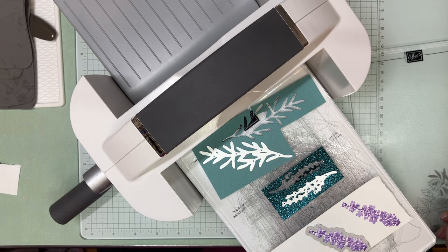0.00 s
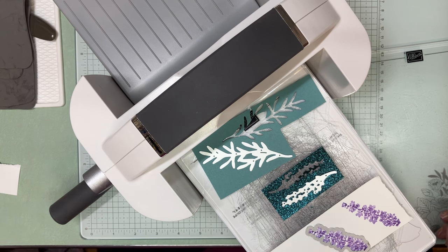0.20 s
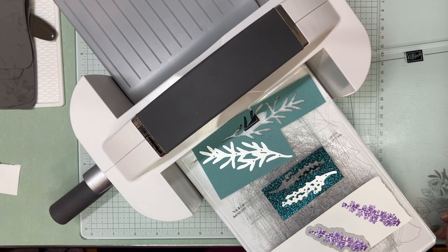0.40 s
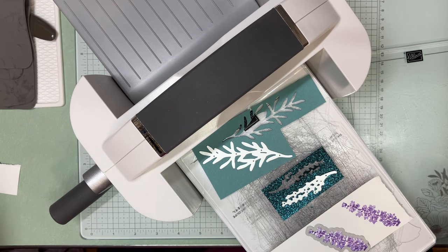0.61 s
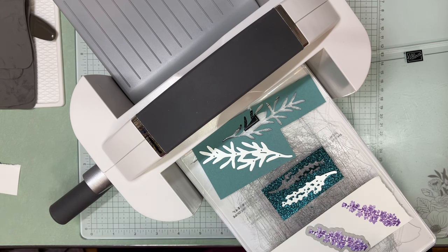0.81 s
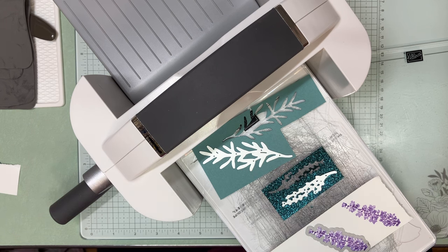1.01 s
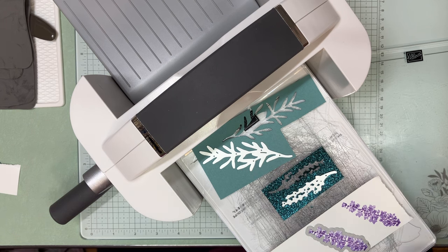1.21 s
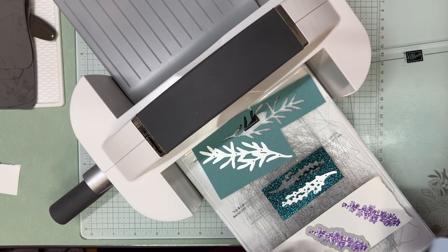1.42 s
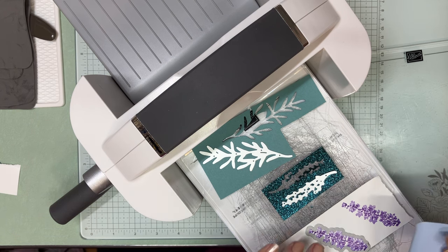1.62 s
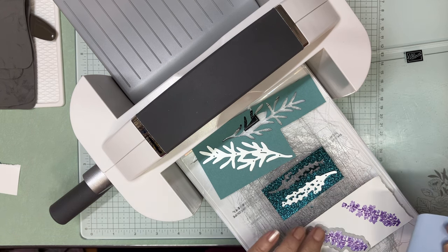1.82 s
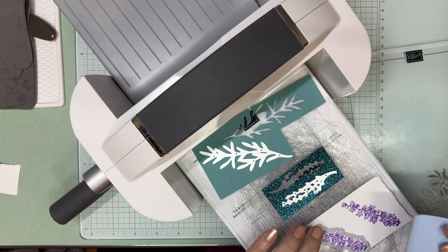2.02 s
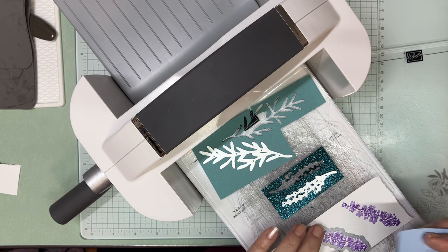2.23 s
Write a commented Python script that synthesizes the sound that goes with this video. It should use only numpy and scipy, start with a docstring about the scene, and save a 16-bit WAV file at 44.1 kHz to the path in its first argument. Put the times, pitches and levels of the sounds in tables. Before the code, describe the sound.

Sticky note peeled with a short rip, pad dropped on a craft table, then light paper flicks and slides

```python
"""Sticky note at a craft table

A note is peeled from its pad, the pad is put down on a craft table, and the note is pressed onto paper.
Peel and slides are trains of tiny random slips; flicks add a crack, a crackle and a brief ring.
The pad's knocks are noise bursts coloured by the ringing table top, with a low sine thud.
A pair of close microphones hears it in a small room with a low rumble and faint hiss."""
import sys
import numpy as np
from scipy import signal
from scipy.fft import rfft, irfft
from scipy.io import wavfile
from scipy.ndimage import map_coordinates

SR = 44100
rng = np.random.default_rng(int(sys.argv[2]) if len(sys.argv) > 2 else 0)


def store_pcm(level_fs):
    """Save levels as 16-bit WAV."""
    pcm = np.round(np.clip(level_fs, -1, 1) * 32767).astype(np.int16)
    wavfile.write(sys.argv[1], SR, np.atleast_2d(pcm).T)


N = 101430
HZ, T = np.fft.rfftfreq(N, 1 / SR), np.arange(N) / SR


def amp(db):
    """Decibels to gain."""
    return 10 ** (np.asarray(db) / 20)


def evened(x):
    """Scales to rms 1."""
    return x / np.sqrt(np.mean(x ** 2) + 1e-20)


def read(points, hz):
    """Reads a table on a log-frequency axis."""
    f, value = np.transpose(points)
    return np.interp(np.log(hz + 1), np.log(f + 1), value)


def level(points):
    """Gain along a level curve, silent outside it."""
    s, db = np.transpose(points)
    return amp(np.interp(T, s, db)) * (T >= s[0]) * (T <= s[-1])


def hump(hz, octaves):
    """Bell-shaped rise of the spectrum, height 1."""
    return np.exp(-.5 * (np.log2((HZ + 1) / hz) / octaves) ** 2)


def treble():
    """Shelf that rises from 0 toward 1 at the top."""
    treble_hz = 5470
    return HZ ** 2 / (HZ ** 2 + treble_hz ** 2)


def delayed(x, s):
    """The same sound, s seconds later."""
    return irfft(rfft(x) * np.exp(-2j * np.pi * HZ * s), N)


def colour(x, db):
    """Causal minimum-phase filter of unit power with the given gain per frequency."""
    gain = evened(amp(db))
    log_gain = np.log(np.r_[gain, gain[-2:0:-1]])
    response = np.exp(np.conj(signal.hilbert(log_gain)))[:len(HZ)]
    return irfft(rfft(x) * response, N)


def pair(a, b, same, pan_db=0):
    """Two microphones hear a shared part a and a differing part b; positive pan favours the left."""
    mid = rfft(a) * np.sqrt((1 + same) / 2)
    side = rfft(b) * np.sqrt((1 - same) / 2)
    return irfft(np.array([mid + side, mid - side]), N) * amp([[pan_db / 2], [-pan_db / 2]])


# how alike the two microphones hear the paper: pitch_hz, likeness (0-1)
MIC_LIKENESS = [(100, 1), (500, 0.84), (1200, 1), (3000, 0), (7000, 0), (15000, 1)]


def radiate(force, db, pan_db=0):
    """Tiny slips of random sign sound through a sheet; 3-7 kHz differs most between the microphones."""
    a, b = colour(force * rng.choice([-1., 1.], (2, N)), db)
    return pair(a, b, np.clip(read(MIC_LIKENESS, HZ), 0, 1), pan_db)


def grains(per_s, spread_db):
    """Random train of slips of uneven size."""
    size = np.minimum(rng.exponential(1, N), 4)
    slips = rng.random(N) < per_s / SR
    return evened(amp(spread_db * size) * slips)


def blow(start, rise_s, decay_s):
    """Quick rounded rise and exponential fall."""
    t = np.maximum(T - start, 0)
    return (1 - np.exp(-(t / rise_s) ** 2)) * np.exp(-t / decay_s)


# spectrum of the room's rumble and hiss: pitch_hz, level_db
FLOOR_COLOUR = [(20, -28), (33, -20), (52, 4), (70, 5.5), (100, -6), (150, -16.5), (250, -22.5), (500, -28),
                (1200, -36.5), (2200, -35), (4000, -40.5), (9000, -47.5), (16000, -43.5)]


def floor():
    """Low room rumble under a faint hiss: coloured noise, shared by both microphones in the lows."""
    floor_db, mono_hz = -60, 540
    a, b = colour(rng.standard_normal((2, N)), read(FLOOR_COLOUR, HZ))
    return amp(floor_db) * pair(a, b, 1 / (1 + (HZ / mono_hz) ** 2), pan_db=1.4)


# decay of the room's tail: pitch_hz, t60_s
ROOM_DECAY = [(100, .2), (500, .17), (1500, 0.14), (4000, 0.17), (8000, 0.16), (16000, 0.1)]
# strength of the diffuse sound: pitch_hz, level_db
ROOM_COLOUR = [(100, -19), (350, -3), (1000, -3), (4000, -3), (8000, -3.5), (16000, -9)]


def room(x):
    """Early reflections from the table and the things on it, then a short tail, both decaying noise."""
    tail_db, early_db, early_decay_s = -11, -3.5, 0.027
    apart_hz = 1200  # above this the microphones hear increasingly separate echoes
    t = T[:SR // 2]
    early, late = rng.standard_normal((2, 2, len(t))) * (t > .002)
    early = early * np.exp(-t / early_decay_s)
    # each band of the tail dies at its own pace
    hz, at, z = signal.stft(late, SR, nperseg=256)
    decay = amp(-60 * at / read(ROOM_DECAY, hz)[:, None])
    late = signal.istft(z * decay, SR)[1][:, :len(t)]
    echo = (amp(early_db) * evened(early) + amp(tail_db) * evened(late)) / np.sqrt(len(t))
    sent = irfft(rfft(x) * amp(read(ROOM_COLOUR, HZ)), N)
    a, b = signal.fftconvolve(sent, echo, axes=1)[:, :N]
    return pair(a, b, 1 / (1 + (HZ / apart_hz) ** 2), pan_db=-0.1)


# the pad lands and settles: start_s, level_db, decay_s, thud_db (against level_db), left_over_right_db
PAD_KNOCKS = [(0.509, -32, 0.043, -27, 2), (.533, -27, 0.018, -10.5, 6), (.552, -30.5, 0.014, -5, -7),
              (0.7322, -38.5, 0.0058, -16, 9)]
# spectrum of the knock: pitch_hz, level_db
KNOCK_COLOUR = [(30, -15), (60, 2.5), (90, -2.5), (125, -10), (170, -19.5), (210, -1.5), (280, -5),
                (420, 2), (560, -5.5), (750, 1), (1400, -3), (2200, -0.5), (3100, -0.5), (4500, -8),
                (8000, -20.5), (16000, -19.5)]
# resonances of the table top: pitch_hz, level_db, twice_t60_s (sets the width of the peak)
TABLE_MODES = [(297, 4, 0.2), (400, -32, 0.17), (683, 5.5, .18), (791, -1.5, .2), (1006, -2.5, 0.14),
               (1100, -10.5, 0.14), (1288, -0.5, 0.077), (1344, 9.5, 0.12), (1692, 6.5, .16),
               (1892, -6, 0.2), (1870, 0, 0.34), (2237, -4.5, 0.086), (2320, 4, .1), (3150, -7, 0.14)]


def knocks():
    """The pad's leaves slap down, ring the table top and give it a soft thud."""
    slap_db, slap_rise_s = -5.5, 0.00017
    thud_hz, thud_rise_s, thud_decay_s = 140.7, 0.016, 0.031
    ring = 0
    for hz, db, width_s in TABLE_MODES:
        ring = ring + amp(db) / (1 + 1j * (HZ - hz) * np.pi * width_s / np.log(1000))
    tone = read(KNOCK_COLOUR, HZ) + 20 * np.log10(abs(amp(slap_db) + ring))
    out = np.zeros((2, N))
    for s, db, decay, thud_db, pan in PAD_KNOCKS:
        out += radiate(amp(db) * blow(s, slap_rise_s, decay), tone, pan)
        thud = blow(s, thud_rise_s, thud_decay_s) * np.sin(2 * np.pi * thud_hz * (T - s))
        out += amp(db + thud_db) * thud
    return out


def patchy(x):
    """The colour drifts at random as the contact moves over the sheet."""
    patch_db, patch_s, patch_hz = 3.5, 0.048, 417  # rms depth, then size of a patch
    hz, at, z = signal.stft(x, SR, nperseg=512)
    where = np.meshgrid(hz / patch_hz, at / patch_s, indexing="ij")
    field = map_coordinates(rng.standard_normal((200, 300)), where, order=1, mode="wrap")
    return signal.istft(z * amp(patch_db * evened(field)), SR)[1][:, :N]


# paper sliding on paper, one curve per stroke: time_s, level_db
SLIDE_STROKES = [
    [(0, -49.5), (.025, -60.5), (.045, -66), (.07, -85)],
    [(.12, -57.5), (.17, -75), (.35, -66), (.395, -50.5), (.42, -55), (.46, -48), (.472, -60.5), (.51, -53)],
    [(.6, -50.5), (.65, -56), (.69, -56.5), (.714, -51.5), (.74, -54.5), (.78, -65.5), (.797, -51.5),
     (.81, -66), (.86, -68), (.93, -71.5)],
    [(.948, -53), (.954, -50), (.99, -52.5), (1.025, -53), (1.085, -48), (1.117, -40), (1.128, -49.5),
     (1.16, -50), (1.171, -38), (1.182, -60.5), (1.24, -55.5), (1.275, -53.5), (1.3, -58), (1.365, -57.5),
     (1.39, -98)],
    [(1.18, -68.5), (1.33, -70.5), (1.39, -71), (1.43, -59.5), (1.55, -68.5), (1.6, -89), (1.65, -70),
     (1.7, -109.5)],
    [(1.78, -97.5), (1.82, -78), (1.88, -95.5), (2.01, -107), (2.04, -59), (2.1, -68), (2.16, -83),
     (2.22, -81), (2.3, -81.5)],
]
# tone of each stroke, in the same order: sheet_flutter_db, body_db, treble_db
SLIDE_TONE = [(19, -10, -7), (18, -17.5, 5), (11.5, -3.5, 9.5), (-2, 2, 4), (2.5, 4, -11),
              (15.5, 4.5, -17.5)]
# spectrum common to the strokes: pitch_hz, level_db
SLIDE_COLOUR = [(100, -9), (280, 0), (450, -1.5), (650, -18.5), (1000, -6.5), (1600, 1.5), (2100, 1),
                (3000, 0.5), (4000, 4), (5500, -3.5), (7200, 8.5), (9000, -9.5), (11300, 3), (16000, -8.5)]


def slides():
    """Fibres catch and slip as paper is moved and smoothed."""
    slips_per_s, spread_db = 16000, 0.9
    flutter_shape = hump(810, octaves=0.15)
    body_shape = hump(1700, octaves=0.17)
    out = np.zeros((2, N))
    for stroke, (flutter, body, high) in zip(SLIDE_STROKES, SLIDE_TONE):
        tone = read(SLIDE_COLOUR, HZ) + flutter * flutter_shape
        tone = tone + body * body_shape + high * treble()
        out += radiate(level(stroke) * grains(slips_per_s, spread_db), tone, pan_db=0.8)
    return out


# flicks and taps of paper: start_s, level_db, rise_s, decay_s, bass_db, treble_db,
# left_over_right_db, ring_hz, ring_db
PAPER_FLICKS = [ (0.1143, -44.5, 0.00025, 0.0077, -3, 1, 6.5, 845, 9),
                (0.2887, -31.5, 0.00079, 0.0093, 10, -13, 5, 558, 3),
                (.458, -35, 0.00083, .003, -23, 7.5, 4.5, 3600, 0),
                (0.506, -24, 0.00048, 0.0054, -10.5, 18.5, 0, 1800, 15.5),
                (0.531, -28, 0.00047, 0.021, -6, 20, -0.5, 1980, 17.5),
                (0.597, -25.5, 0.0014, 0.0044, 5, -6.5, 2.5, 3760, 8),
                (0.712, -47, 0.00096, 0.0039, -24, 9.5, 3, 3000, -12.5),
                (0.882, -54, 0.00054, 0.0067, 13, -44, 3, 417, 7.5),
                (0.9521, -44.5, 0.00025, 0.013, -6.5, -24, 1.5, 1510, 0),
                (1.0393, -29.5, 0.00037, 0.0036, -2, -9.5, 6, 2300, 5.5),
                (1.0448, -30.5, 0.0013, 0.005, 8, -14, -3.5, 490, 5.5),
                (1.0627, -21, 0.00045, 0.0046, -10, -8.5, -2, 1176, 3.5),
                (1.119, -42.5, 0.00045, 0.0043, -11, -4, 5, 520, 14),
                (1.164, -55, 0.0005, 0.0065, 10, 1, -13, 1360, 4),
                (1.796, -70.5, 0.00022, 0.0046, 2.5, 5.5, -1, 2070, 9),
                (2.015, -60, .0003, 0.004, -22, 15, -1, 7000, 12),
                (2.0444, -23.5, 0.0021, 0.0035, -29, 13, -3, 2100, 9)]
# spectrum common to the flicks: pitch_hz, level_db
FLICK_COLOUR = [(50, -21.5), (160, -21), (270, -3), (370, 1), (480, 0), (600, -4.5), (1100, -2),
                (1700, -2.5), (2400, -2), (4500, 0.5), (7400, -7), (11000, -8.5), (16000, -20.5)]


def flicks():
    """A paper edge snaps or is tapped down: a crack, a dense crackle, a brief ring of the free sheet."""
    crack_db, crack_soften_s = 14, .0012  # the slower the rise, the weaker the crack
    bass = 1 / (1 + (HZ / 770) ** 2)
    body, top = read(FLICK_COLOUR, HZ), treble()
    crackle = grains(per_s=9000, spread_db=1)
    out = np.zeros((2, N))
    for s, db, rise, decay, low, high, pan, ring_hz, ring_db in PAPER_FLICKS:
        tone = body + low * bass + high * top + ring_db * hump(ring_hz, octaves=0.31)
        out += radiate(amp(db) * blow(s, rise, decay) * crackle, tone, pan)
        crack = colour(signal.unit_impulse(N, round((s + rise) * SR)), tone)
        out += amp(db + crack_db) * np.exp(-rise / crack_soften_s) * crack
    return out


# level of the peel as the glue lets go: time_s, level_db
PEEL_LEVEL = [(.17, -68), (.2, -57.5), (.226, -54.5), (.241, -36), (.256, -43), (.272, -33), (.285, -35.5),
              (.296, -36.5), (.312, -51.5), (.345, -60.5)]
# spectrum of the peel: pitch_hz, level_db
PEEL_COLOUR = [(60, 0), (170, -8), (240, -7), (320, 2), (520, -6), (750, -5.5), (1800, -4.5), (2800, -0.5),
               (6000, -4), (10000, -6), (16000, -16)]


def peel():
    """Threads of glue snap one after another, a random train sounding through the note."""
    snaps = grains(per_s=3400, spread_db=1)
    return radiate(level(PEEL_LEVEL) * snaps, read(PEEL_COLOUR, HZ), pan_db=1.9)


# echoes thrown back by near surfaces: delay_s, level_db
NEAR_ECHOES = [(.0009, -20.5), (.0024, -21)]


def scene():
    """The hands work a little to the right, so the left microphone hears them later."""
    left_lag_s = .000145
    paper = knocks() + patchy(slides()) + flicks() + peel()
    near = paper + sum(amp(db) * delayed(paper, s) for s, db in NEAR_ECHOES)
    direct = np.array([delayed(near[0], left_lag_s), near[1]])
    return floor() + room(paper) + direct


def record(dry):
    """The recorder's low cut and band limit."""
    low_cut_hz, edge_hz = 32, 16200
    low_cut = signal.butter(2, low_cut_hz, "high", fs=SR, output="sos")
    band_limit = signal.firwin(511, edge_hz, window=("kaiser", 9), fs=SR)
    return signal.oaconvolve(signal.sosfilt(low_cut, dry), band_limit[None], "same")


dry = scene()
out = record(dry)
store_pcm(out)
```